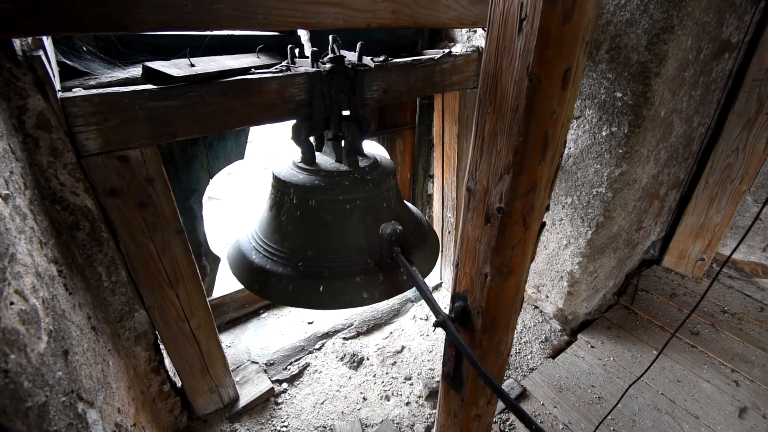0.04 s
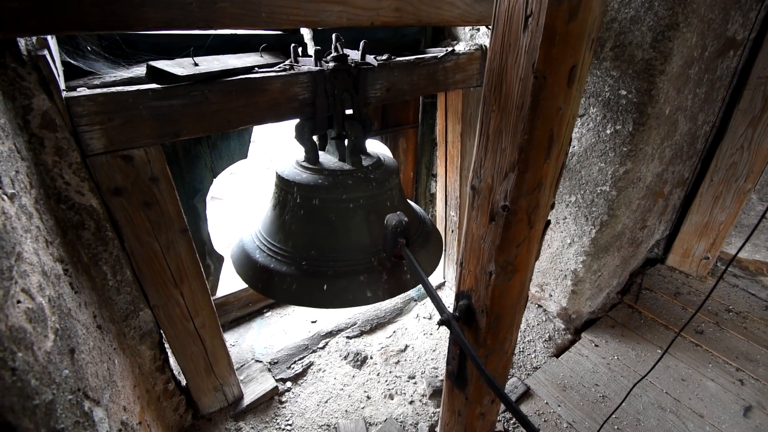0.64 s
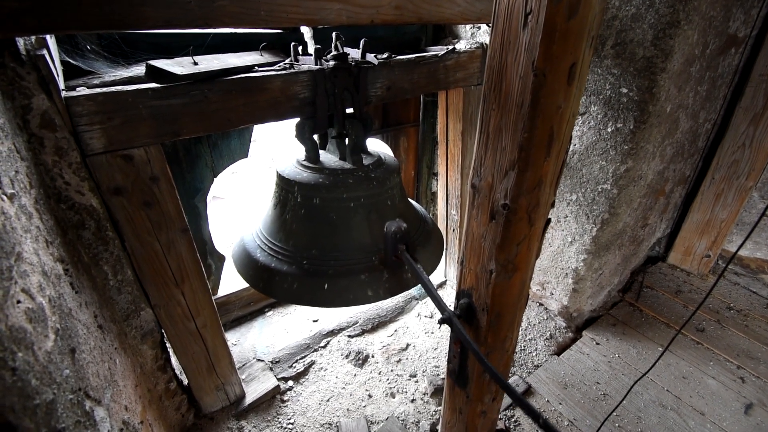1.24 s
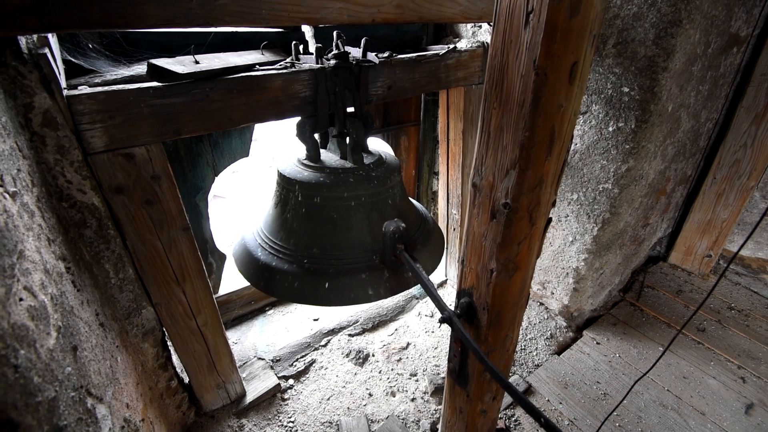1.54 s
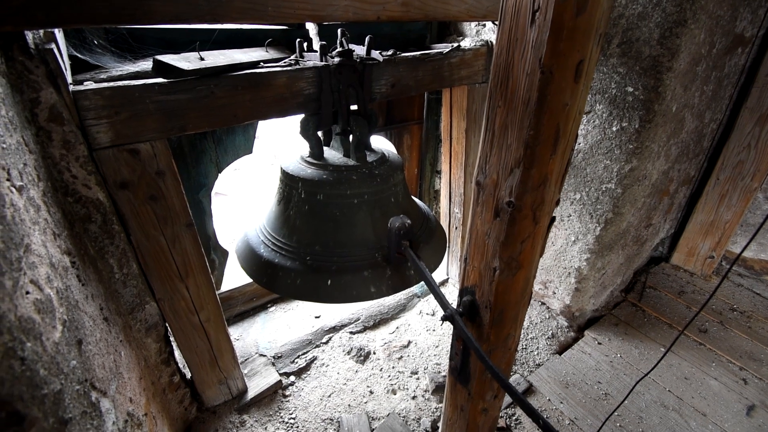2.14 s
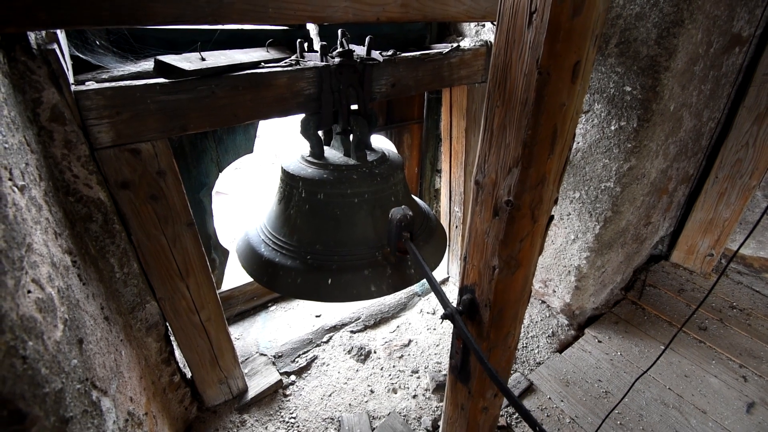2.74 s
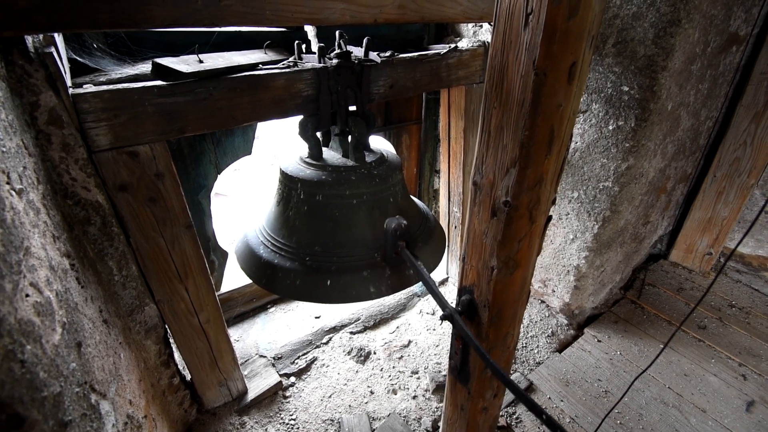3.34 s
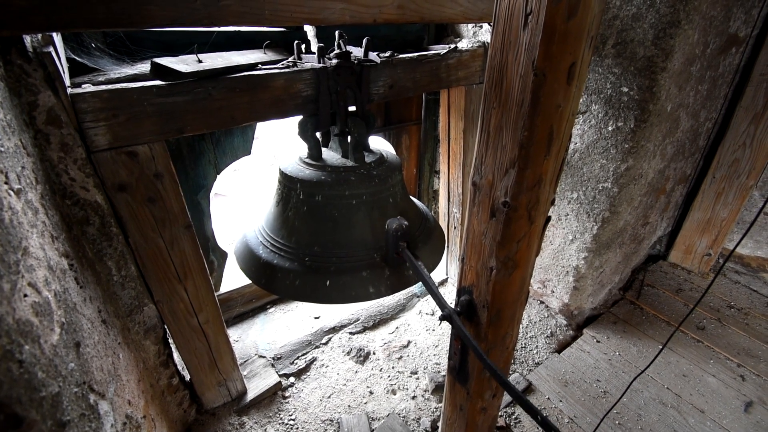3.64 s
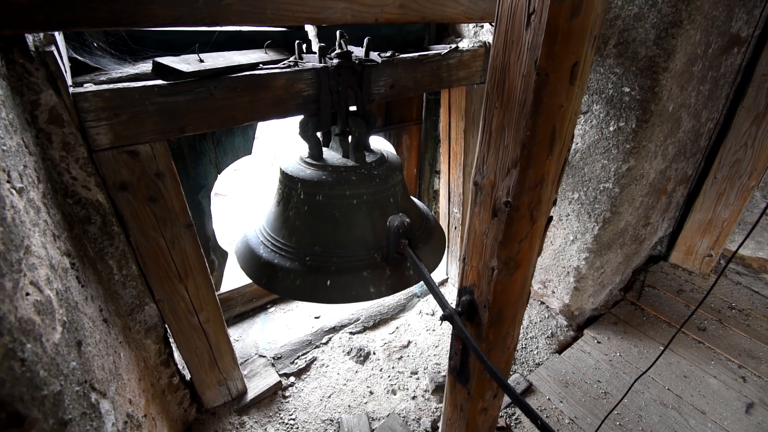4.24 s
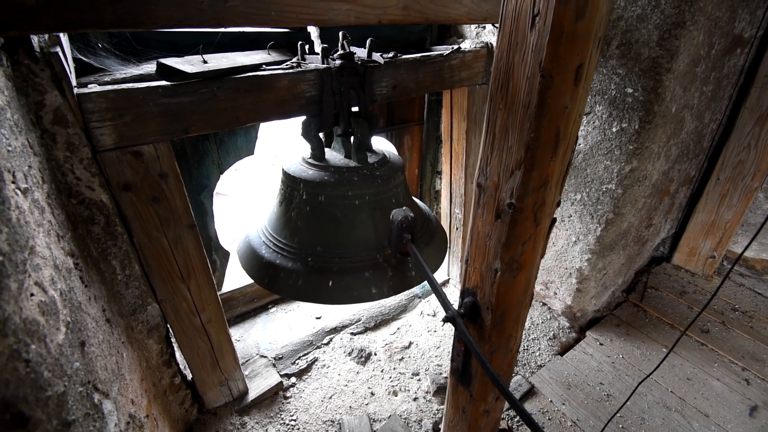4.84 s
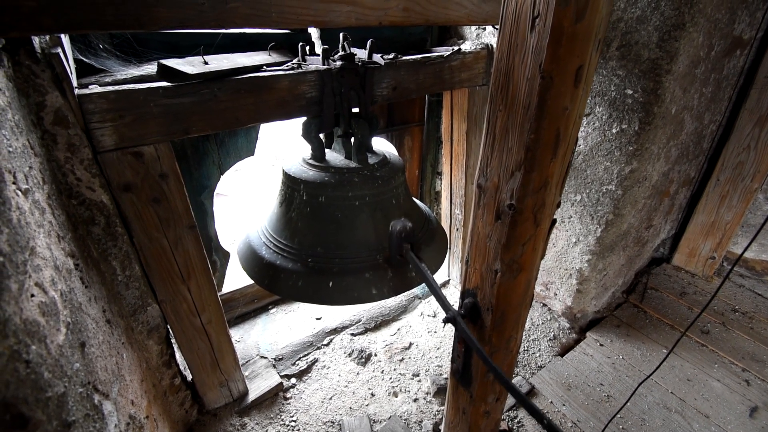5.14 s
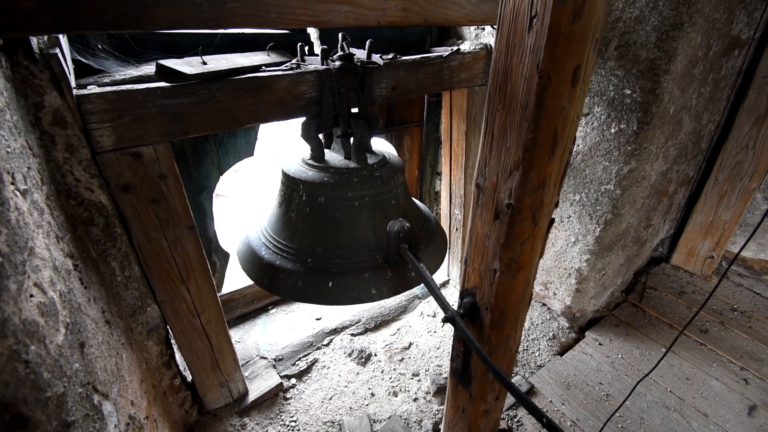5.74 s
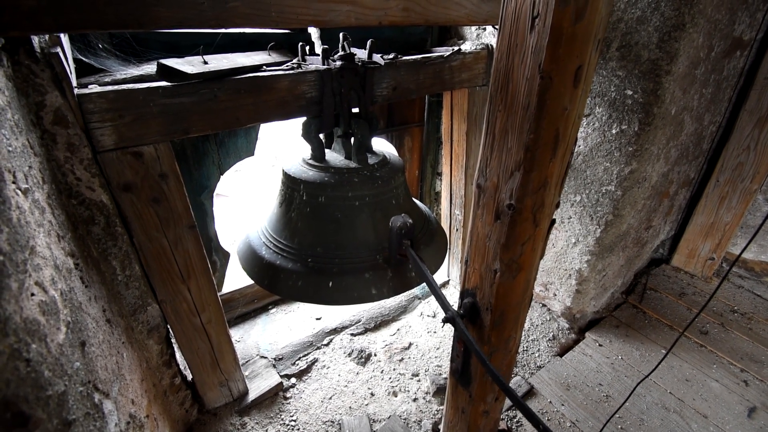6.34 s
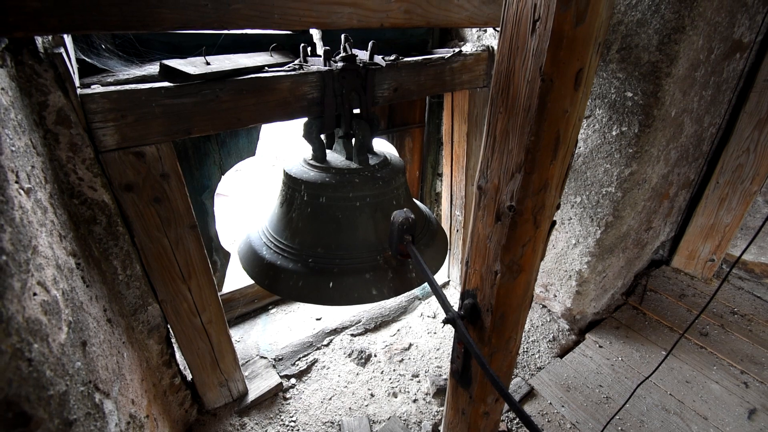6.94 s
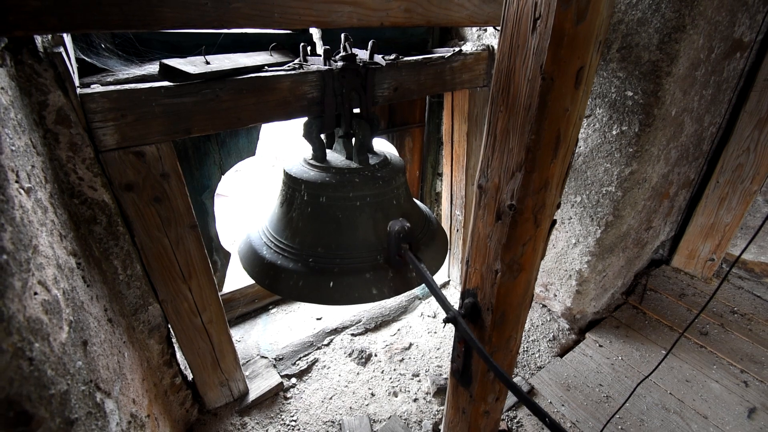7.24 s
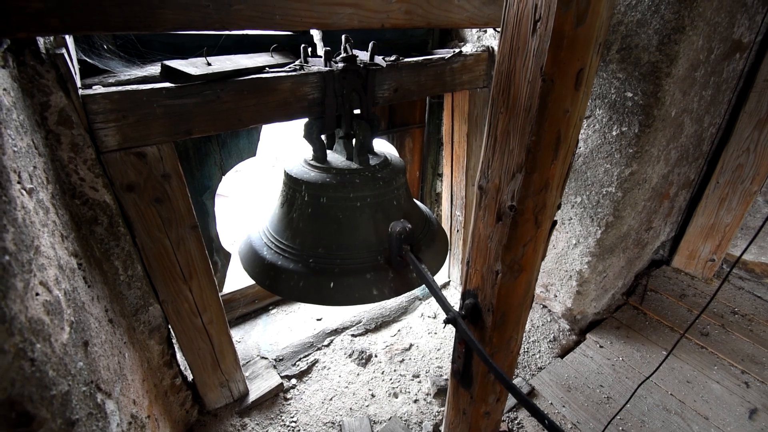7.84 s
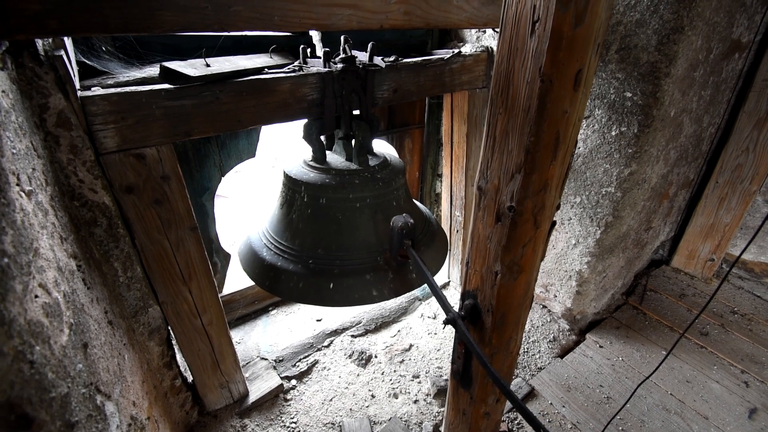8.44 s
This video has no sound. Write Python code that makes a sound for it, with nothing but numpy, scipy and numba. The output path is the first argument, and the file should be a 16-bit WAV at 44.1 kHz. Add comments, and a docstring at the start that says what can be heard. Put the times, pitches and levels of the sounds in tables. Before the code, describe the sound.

Close to the microphone in a stone belfry, a tower clock tolls slowly on one bronze bell. The ring of an earlier stroke gives way to four evenly spaced metallic clangs of the same pitch, each shimmering and pulsing until the next arrives. Around the blows, the mechanism thuds against timber, iron joints clink and a slack wire ticks faintly. The level dips at each hit and swells as the ring fades.

```python
"""A stone belfry, close to the bronze bell that the tower clock strikes every two seconds.
A wire lifts the hammer with a creak and lets go with a clunk; the hammer lands and rebounds on its
spring, knocking through the timber frame. Each partial of the bell is a beating pair. Automatic gain
control ducks at each blow and swells as the ring fades, over faint outdoor air."""
import sys
import numpy as np
from scipy import signal
from scipy.fft import rfft, irfft, next_fast_len
from scipy.io import wavfile
from scipy.ndimage import uniform_filter1d
from numba import njit

SR = 44100
rng = np.random.default_rng(int(sys.argv[2]) if len(sys.argv) > 2 else 0)


def bounce(signal):
    """Save signal as a 16-bit WAV file at the path given by the first command-line argument."""
    frames = np.transpose(np.atleast_2d(signal))
    limited = np.clip(frames, -1, 1)
    pcm = np.round(limited * 32767).astype(np.int16)
    wavfile.write(sys.argv[1], SR, pcm)


N = 383229
TIME = np.arange(N) / SR

# hammer blows, the first already ringing at the start: start_s, treble_db, hum_db, hum_beat_phase_cycles
BLOWS = [(-.81, 3.5, -39.5, .05), (1.219, -1, -37.5, .15), (3.219, -.5, -43.5, .23), (5.198, .5, -43, .05),
         (7.148, -.5, -39.5, .05)]
# the bell's main partials, each with a detuned twin:
# pitch_hz, level_db, t60_s, twin_offset_hz, twin_db, twin_phase_cycles, pan_left_db, left_lead_rad
PARTIALS = [ (670.0, -16.5, 4.9, .45, 1, .48, -.1, .02), (823.3, -20, 3.7, -4.89, -6.6, .14, -.2, -.03),
            (1111.2, -24.3, 3.1, 1.1, -1, .97, -.3, .14), (1135.2, -31, 1.8, 2.35, -8.9, .71, -.2, .3),
            (1632.8, -16.2, 4.1, .98, -21, .55, 0, -.01), (1758.7, -31.3, 3.5, -2.71, -6, .5, .6, .11),
            (1964.9, -47.5, 4.8, .57, -15, .71, -.8, .03), (2218.8, -16.6, 2.8, 2.76, -9, .93, -1.6, .09),
            (2448.2, -43.5, 2.4, 1.5, -12, .3, -.3, -.06), (2468.5, -37.8, 1.9, 2.11, -2.9, .39, -.6, .14),
            (2642.5, -42, 1.8, 4.64, -8.4, .96, 0, -.11), (2854.3, -24, 2.65, .88, -8.7, .96, .1, -.03),
            (2949, -42.7, 2.4, -2.92, -2, .61, -.1, 0), (3448, -40, 2, -1.8, -9, .2, .1, 0),
            (3519.8, -30, 2.5, -2.84, -8.3, .8, 1.5, 0), (4200.4, -31.7, 2, -2.41, -3.5, .57, 0, .07)]
# the bell's faint upper shimmer: pitch_hz, level_db, t60_s
OVERTONES = [(2143, -49, 2.4), (2509, -48, 2), (2836, -49, 2), (3080, -49, 2), (3690, -50, 2.8),
             (4009, -48, 1.9), (4109, -56, 1.8), (4876, -46, 2.1), (4903, -48, 2.1), (5297, -59, 1.7),
             (5573, -56, 1.9), (5718, -56, 1.6), (5900, -60, 1.7), (6256, -61, 1.6), (6744, -61, 1.6),
             (6931, -60, 1.6), (7586, -59.5, 1.5), (8250, -64, 1.2), (8600, -63, 1.2), (9000, -62, 1.1),
             (9650, -64, 1), (10400, -68, .8), (11200, -68, .7)]
# ring of the iron hammer, its arm and the timber frame: pitch_hz, level_db, t60_s
HAMMER_MODES = [(122, -42, 1.3), (905, -29, .35), (1010, -28, .35), (1299, -24, .45), (1385, -27, .35),
                (1490, -25, .25), (1900, -27, .25), (2290, -21, .1), (3560, -22, .12)]
# lever lets go, wire snaps slack, hammer falls back on its spring, arm clinks twice, wire takes up again:
# after_blow_s, thud_db, rattle_db, thud_t60_s
KNOCKS = [ (-.094, -34, -50.5, .3), (-.05, -42, -58, .25), (.168, -38, -57, .45), (.209, -50, -54, .12),
          (.275, -50, -60, .12), (.86, -46, -76, .5)]
# pivot squeaks on some of the rebounds: centre_s, pitch_hz, level_db
SQUEAKS = [(1.44, 3950, -48), (1.585, 3800, -46), (3.578, 3815, -42), (5.567, 3810, -47)]
# tone curves for the noise layers: frequency_hz, relative_db
CLACK_EQ = [(100, -12), (700, -3), (1400, 0), (2500, -6), (4300, -4), (6000, -13), (10500, -15),
            (15500, -21)]  # hard hammer contact
CLANG_EQ = [(100, -8), (500, -14), (900, 0), (1400, 0), (2200, -5), (3200, -14), (5000, -20), (9000, -31),
            (15000, -44)]  # metallic wash after the blow
THUD_EQ = [(25, -25), (60, -11), (95, -2), (122, 7), (150, -8), (180, -1), (230, -5), (300, -3), (370, -9),
           (460, 1), (650, -9), (1400, -13), (2500, -26), (6000, -50), (14000, -75)]  # timber frame
RATTLE_EQ = [(300, -15), (1200, 0), (3000, -2), (5500, -5), (9000, -12), (15000, -17)]  # loose iron joints
CREAK_EQ = [(2000, -20), (3300, 1), (4500, -5), (5200, -5), (5450, 4), (5900, -13), (7550, -17), (7750, 3),
            (8000, -20), (10100, -22), (10300, -6), (10600, -24), (15000, -30)]  # wire under load
TICK_EQ = [(200, -8), (600, 0), (1300, -2), (3000, -16), (6000, -32), (14000, -48)]  # slack wire
AIR_EQ = [(25, -22), (60, -5), (130, 1), (190, 4), (300, -8), (600, -8), (1280, -15), (1360, -7),
          (1450, -15), (3000, -26), (5500, -35), (8000, -49), (15000, -60)]  # outdoor air


def bell(contact_s=.002, damping_s=.012, hum_hz=270.2, hum_t60_s=60, hum_beat_hz=1.53, treble_hz=1500):
    """Each blow chokes the old ring and starts the partials anew over a long, low hum."""
    age = TIME[:N // 4]
    ring = struck_metal(age)
    # a harder contact drives the upper partials more
    treble = signal.sosfiltfilt(signal.butter(2, treble_hz, "high", fs=SR, output="sos"), ring)
    # besides its quick beat, the hum swells slowly
    swell = beat(age, offset_hz=.33, twin_db=-10, phase_cycles=.22)
    out = np.zeros((2, N))
    ends = [row[0] for row in BLOWS[1:]] + [N / SR]
    for (start, treble_db, hum_db, phase), end in zip(BLOWS, ends):
        throb = beat(age, hum_beat_hz, twin_db=-11, phase_cycles=phase)
        hum = mode(age, hum_hz, hum_db, hum_t60_s) * throb * swell
        stroke = ring + (undb(treble_db) - 1) * treble + hum.imag
        gate = np.minimum(age / contact_s, 1) * np.clip(1 - (start + age - end) / damping_s, 0, 1)
        at = int(start * SR) + np.arange(len(age))
        heard = (at >= 0) & (at < N)
        out[:, at[heard]] += (gate * stroke)[:, heard]
    return out


def struck_metal(age, split_hz=3.5, twin_db=-8):
    """The ring of one blow: beating bronze partials, with a brief note from the hammer and frame."""
    ring = sum(standing_waves(mode(age, hz, db, t60) * beat(age, *twin), pan_db, lead_rad)
               for hz, db, t60, *twin, pan_db, lead_rad in PARTIALS)
    for hz, db, t60 in OVERTONES:
        shimmer = mode(age, hz, db, t60) * beat(age, split_hz * rng.uniform(.5, 2), twin_db, rng.random())
        ring += standing_waves(shimmer, pan_db=rng.normal(0, 1.5), lead_rad=rng.normal(0, .25))
    return ring + sum(mode(age, *row).imag for row in HAMMER_MODES)


def mode(age, hz, db, t60_s):
    """One decaying vibration as a rotating phasor."""
    return undb(db) * np.exp((2j * np.pi * hz - np.log(1000) / t60_s) * age + 2j * np.pi * rng.random())


def beat(age, offset_hz, twin_db, phase_cycles):
    """The bell is not quite round, so each mode beats against a slightly detuned twin."""
    return 1 + undb(twin_db) * np.exp(2j * np.pi * (offset_hz * age + phase_cycles))


def standing_waves(wave, pan_db, lead_rad):
    """Standing waves in the tower give left and right their own level and phase of a partial."""
    half = undb(pan_db / 2) * np.exp(.5j * lead_rad)
    return np.array([(wave * half).imag, (wave / half).imag])


def hammer(lead_s=.011):
    """The hammer chatters against its spring, then meets the bronze; the stone walls return the clang."""
    spring = fades(each_blow(-lead_s, db=-27, t60_s=.07), rise_s=.001)
    chatter = fades(each_blow(-lead_s / 2, db=-26, t60_s=.07), rise_s=.001)
    hit = fades(each_blow(0, db=-18.5, t60_s=.03), rise_s=.001)
    clang = fades(each_blow(0, db=-26.5, t60_s=.45), rise_s=.002)
    walls = fades(each_blow(0, db=-48, t60_s=1.8), rise_s=.03)
    return (spring + chatter + hit) * noise(CLACK_EQ) + (clang + walls) * noise(CLANG_EQ)


def linkage(rattle_t60_s=.13, bounce_span_s=.04, bounce_fall_db=12, bounce_t60_s=.025):
    """Timber thuds and iron rattles in the same order at every stroke; the wire creaks as it lifts."""
    thuds = [row for after, db, _, t60 in KNOCKS for row in each_blow(after, db, t60)]
    rattles = [row for after, _, db, _ in KNOCKS for row in each_blow(after, db, rattle_t60_s)]
    # loose joints bounce three times after each knock, softer the later they land
    bounces = [(start + bounce_span_s * late, db - bounce_fall_db * late, bounce_t60_s)
               for start, db, _ in rattles for late in rng.random(size=3)]
    thud = fades(thuds, rise_s=.006)
    rattle = fades(rattles, rise_s=.001) + fades(bounces, rise_s=.0005)
    creak = fades(each_blow(after_s=1.453, db=-68.5, t60_s=.3), rise_s=.012)
    return thud * noise(THUD_EQ) + rattle * noise(RATTLE_EQ) + creak * noise(CREAK_EQ)


def slack_wire(count=26, span_s=.95, tick_db=-49, fall_db=13, scatter_db=2.5, t60_s=.08):
    """The slack wire ticks at random while the hammer bobs to rest, and drags as it lifts again."""
    ticks = []
    for start, *_ in BLOWS:
        for late, accent in zip(rng.random(count), rng.standard_normal(count)):
            ticks.append((start + span_s * late, tick_db - fall_db * late + scatter_db * accent, t60_s))
    drag = fades(each_blow(after_s=1.656, db=-67, t60_s=1.2), rise_s=.08)
    return (fades(ticks, rise_s=.001) + drag) * noise(TICK_EQ)


def pivot(half_width_s=.016, harmonic_step_db=-13, waver=.012):
    """The pivot sticks and slips in short squeaks with an unsteady pitch."""
    out = np.zeros(N)
    wobble = uniform_filter1d(rng.standard_normal(N), size=200)
    for centre, hz, db in SQUEAKS:
        near = np.abs(TIME - centre) < 4 * half_width_s
        pitch_hz = hz * (1 + waver * wobble[near] / wobble.std())
        phase = 2 * np.pi * np.cumsum(pitch_hz) / SR
        tone = sum(undb(harmonic_step_db * k) * np.sin((k + 1) * phase) for k in range(3))
        out[near] += undb(db) * np.exp(-((TIME[near] - centre) / half_width_s) ** 2) * tone
    return out


def outdoor_air(level_db=-67.5):
    """A faint, steady bed of low air from outside the tower."""
    return undb(level_db) * noise(AIR_EQ)


def each_blow(after_s, db, t60_s):
    """The same cue at a set delay from every blow: start_s, level_db, t60_s."""
    return [(start + after_s, db, t60_s) for start, *_ in BLOWS]


def fades(cues, rise_s):
    """An envelope in which each cue ramps up and dies away exponentially."""
    out = np.zeros(N)
    for start, db, t60 in cues:
        span = slice(*np.searchsorted(TIME, [start, start + 1.5 * t60]))
        age = TIME[span] - start
        out[span] += undb(db) * np.minimum(age / rise_s, 1) * np.exp(-np.log(1000) * age / t60)
    return out


def noise(eq, full_width_hz=50000):
    """Shaped stereo noise at unit level, centred in the bass and wider in the treble."""
    size = next_fast_len(N, True)
    hz = np.maximum(np.fft.rfftfreq(size, 1 / SR), 1)
    points_hz, db = np.transpose(eq)
    curve = undb(np.interp(np.log(hz), np.log(points_hz), db))
    mid, side = rfft(rng.standard_normal((2, size))) * curve
    side = side * np.minimum(hz / full_width_hz, 1) ** .55
    sound = irfft([mid + side, mid - side], size)[:, :N]
    return sound / sound.std()


def undb(db):
    """Decibels to gain."""
    return 10 ** (np.asarray(db) / 20)


@njit
def ride_fader(level_db, top_db, max_db, min_db, start_db, smoothing, creep_db, step_db):
    """Gain in dB that steps down when the output would pass the top, then creeps back up."""
    out = np.empty(len(level_db))
    gain = aim = start_db
    for i in range(len(level_db)):
        if level_db[i] + aim > top_db:
            aim = max(top_db - level_db[i] - step_db, min_db)
        aim = min(aim + creep_db, max_db)
        gain += (aim - gain) * smoothing
        out[i] = gain
    return out


def gain_control(sound, top_db, max_db, min_db, start_db, release_db_per_s, step_db):
    """Automatic gain that follows the short-term level: quick to duck, slower to recover."""
    window_s, attack_s = .012, .004
    power = uniform_filter1d(np.mean(sound ** 2, axis=0), int(window_s * SR))
    level_db = 10 * np.log10(np.maximum(power, 1e-12))
    gain_db = ride_fader(level_db, top_db, float(max_db), float(min_db), float(start_db),
                         1 / (attack_s * SR), release_db_per_s / SR, float(step_db))
    return sound * undb(gain_db)


def scene():
    """The bell up front, its striking work around it and the air behind."""
    return bell() + hammer() + linkage() + slack_wire() + pivot() + outdoor_air()


def record(dry, top_cut_hz=16000):
    """Slow gain control, a quick limiter that flutters on the loud ring, a peak clip and a top cut."""
    levelled = gain_control(dry, top_db=-9.5, max_db=19, min_db=-30, start_db=7.8,
                            release_db_per_s=9.2, step_db=.2)
    limited = gain_control(levelled, top_db=-13.6, max_db=0, min_db=-3, start_db=0,
                           release_db_per_s=27, step_db=2)
    top_cut = signal.ellip(8, .2, 70, top_cut_hz, fs=SR, output="sos")
    return signal.sosfilt(top_cut, np.clip(limited, -.9, .9))


dry = scene()
out = record(dry)
bounce(out)
```